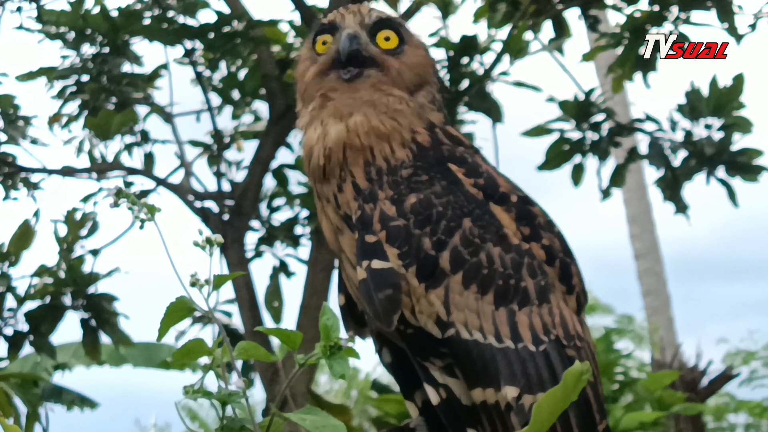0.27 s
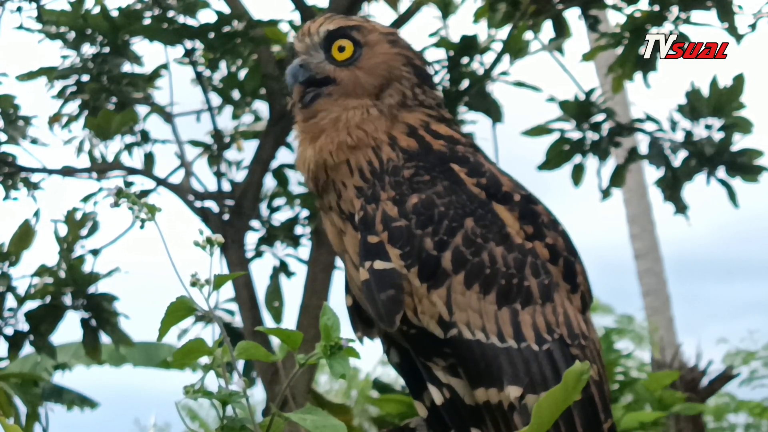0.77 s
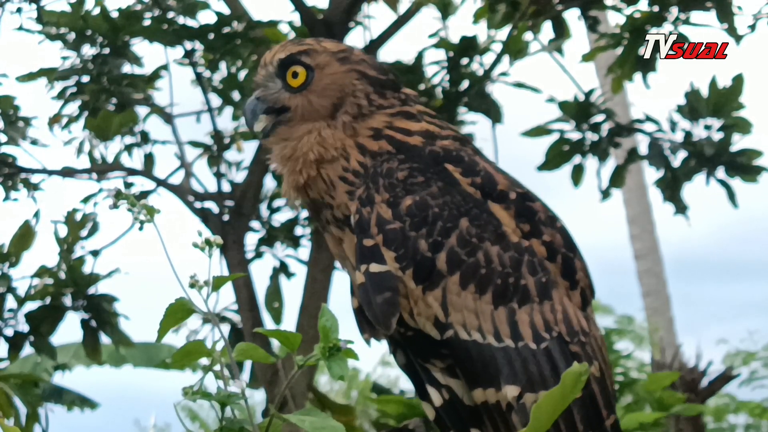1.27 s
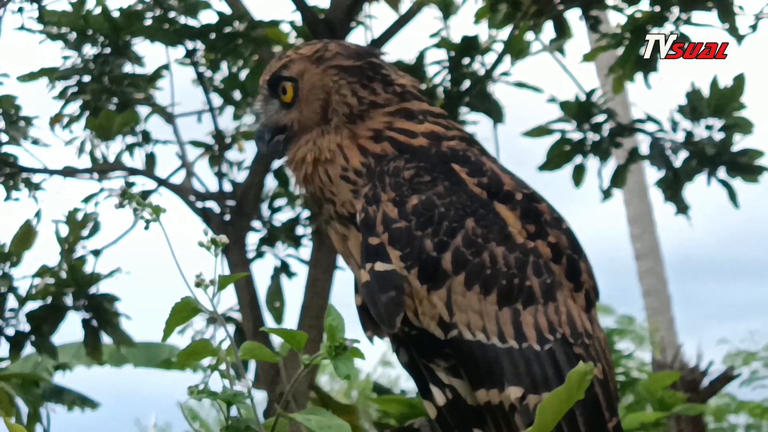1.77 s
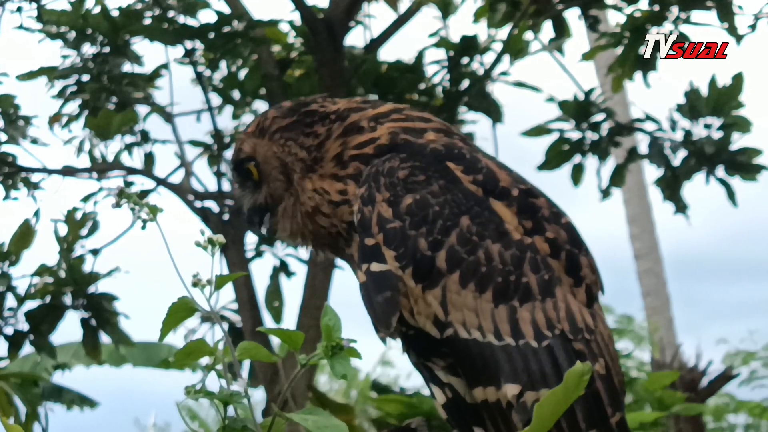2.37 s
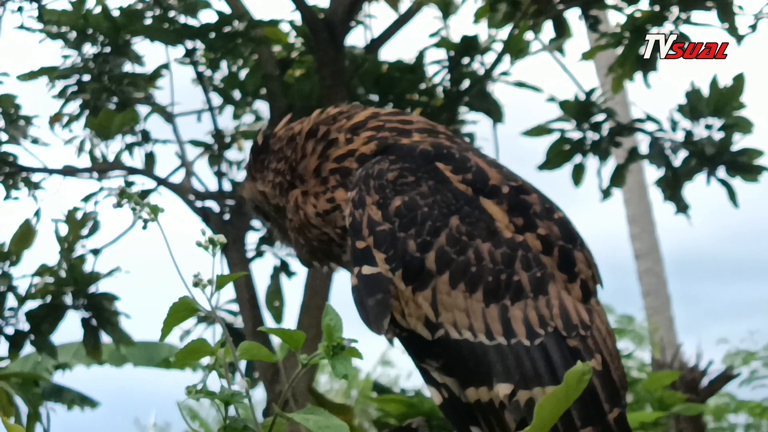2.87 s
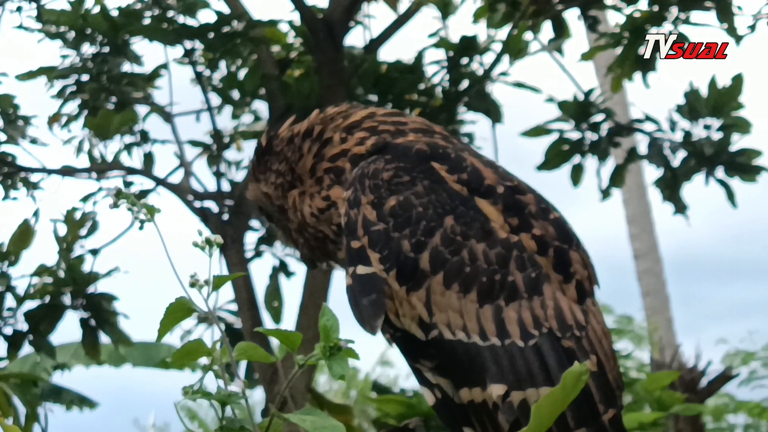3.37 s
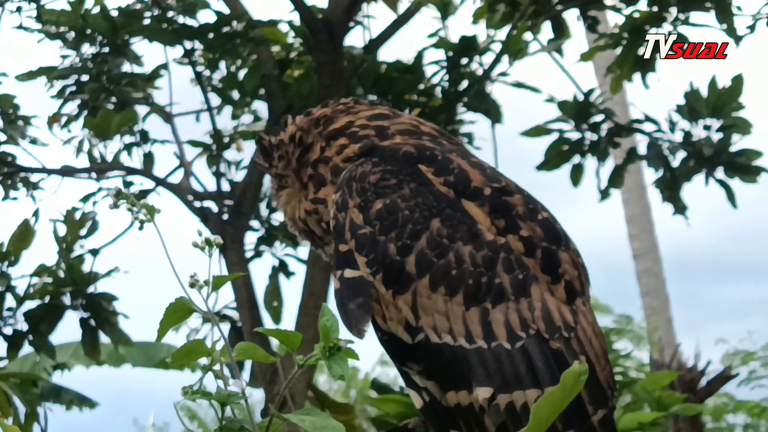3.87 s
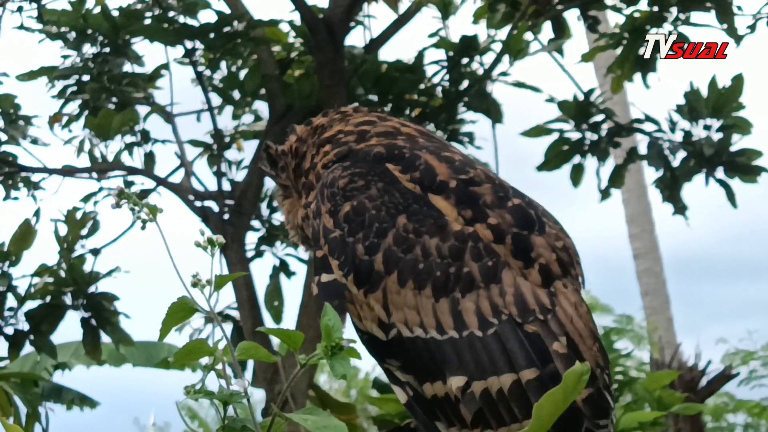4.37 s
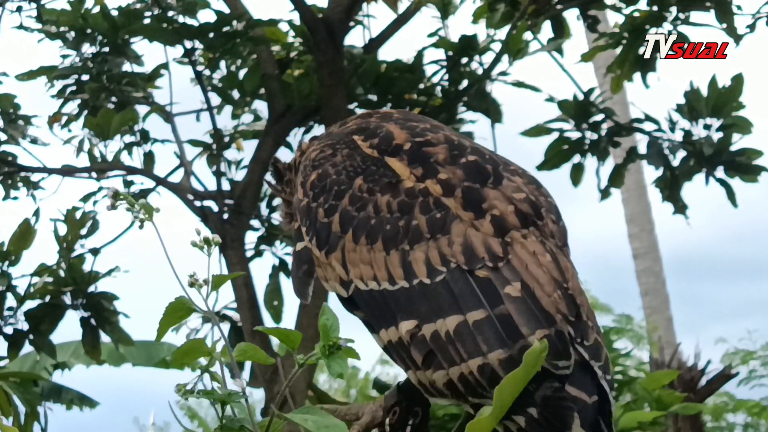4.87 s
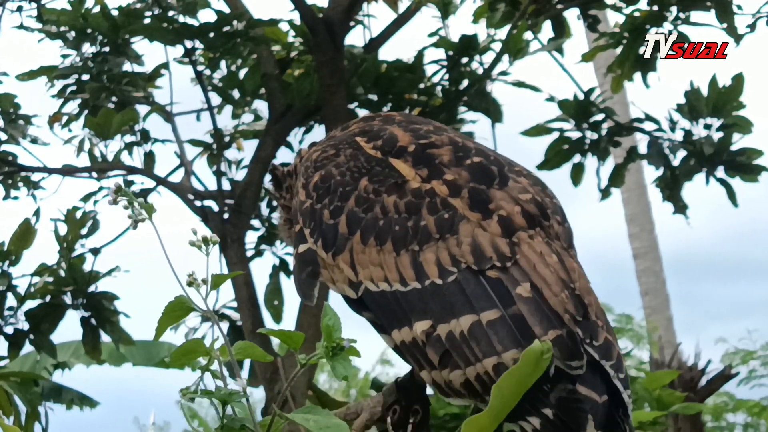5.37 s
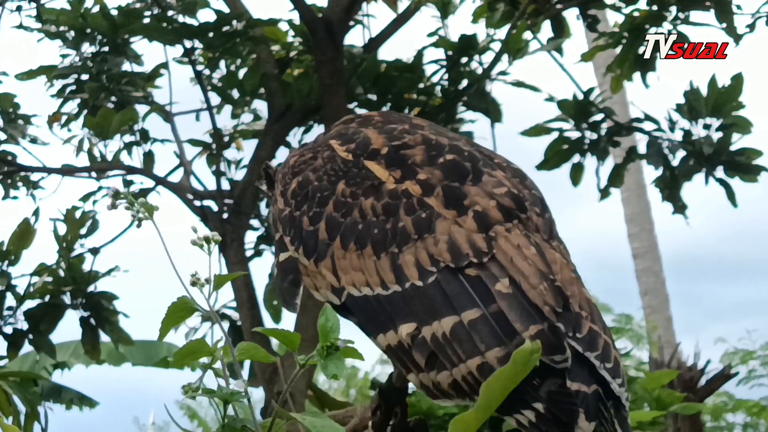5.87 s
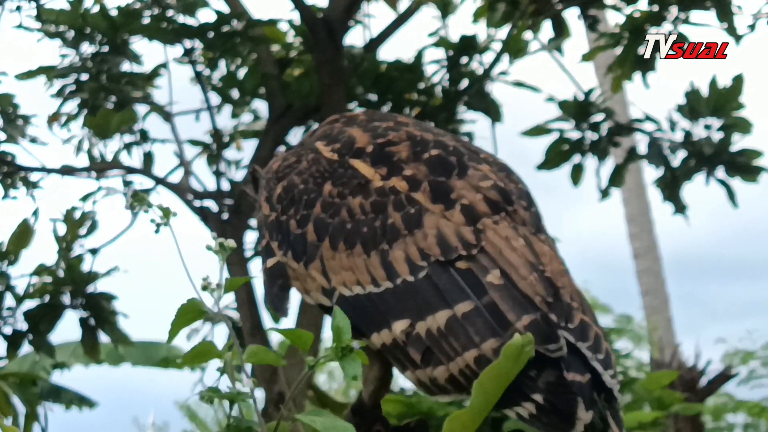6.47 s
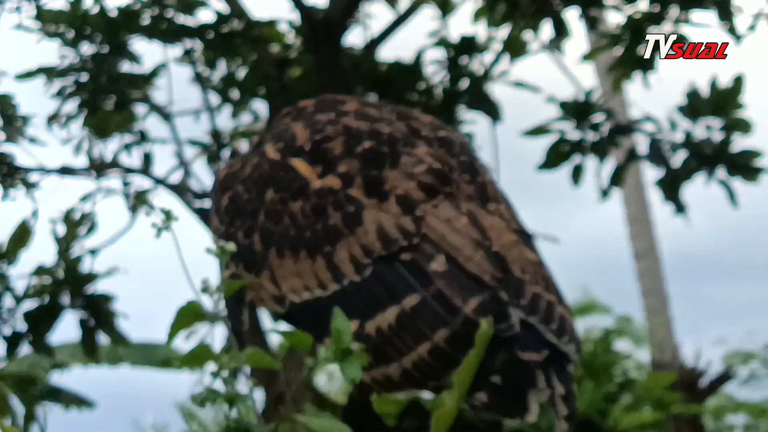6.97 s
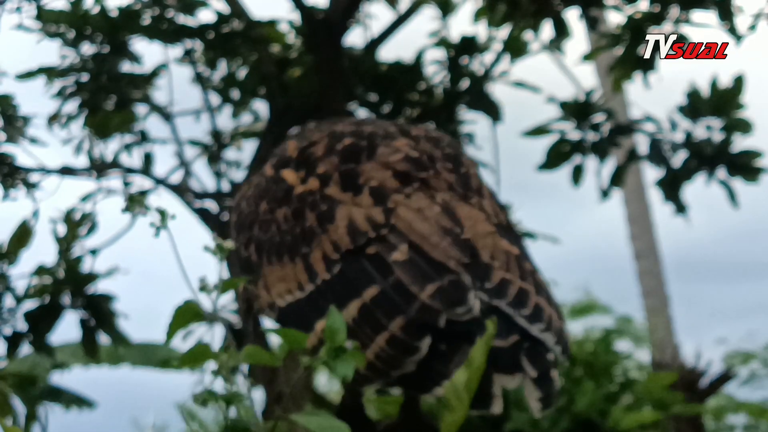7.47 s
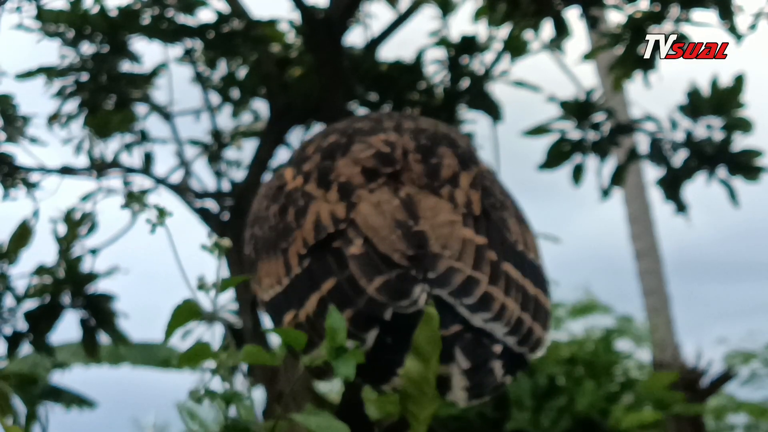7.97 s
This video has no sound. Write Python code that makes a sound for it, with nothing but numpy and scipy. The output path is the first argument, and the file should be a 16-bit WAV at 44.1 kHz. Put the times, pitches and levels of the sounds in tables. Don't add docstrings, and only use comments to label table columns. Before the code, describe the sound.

A small owl gives soft whistled hoots in short-long pairs over a constant buzzing of cicadas, with small birds chirping and light wind bumping the microphone.

```python
import sys
import numpy as np
from scipy import signal
from scipy.fft import rfft, irfft, next_fast_len
from scipy.io import wavfile

SR = 44100
rng = np.random.default_rng(int(sys.argv[2]) if len(sys.argv) > 2 else 0)


def magnitude_from_level(level_db):
    exponent = np.asarray(level_db, float) / 20
    return 10 ** exponent


def file_out(sig):
    cols = np.atleast_2d(sig).T
    lim = np.clip(cols, -1, 1)
    pcm = np.round(lim * 32767).astype(np.int16)
    wavfile.write(sys.argv[1], SR, pcm)


N = 362061


def rms_one(x):
    return x / np.sqrt(np.mean(x ** 2) + 1e-20)


def in_time(rows):
    s, *columns = np.transpose(rows)
    return [np.interp(np.arange(N) / SR, s, c) for c in columns]


def drift(rate_hz, size):
    r = np.exp(-80 * np.pi * rate_hz / SR)
    noise = rng.standard_normal(size // 40 + 1002)
    slow = signal.lfilter([1], [1, -2 * r, r * r], noise)[1000:]
    return np.interp(np.arange(size) / 40, np.arange(len(slow)), rms_one(slow))


def coloured(spectrum):
    size = next_fast_len(N)
    hz = np.fft.rfftfreq(size, 1 / SR) + 1e-3
    points_hz, points_db = np.transpose(spectrum)
    gain = magnitude_from_level(np.interp(np.log(hz), np.log(points_hz), points_db, left=-90, right=-90))
    return rms_one(irfft(rfft(rng.standard_normal(size)) * gain, size)[:N])


def add(out, s, sound):
    i = round(s * SR)
    out[i:i + len(sound)] += sound[:N - i]


def note(length_s, pitches_hz, sharp):
    u = np.arange(round(length_s * SR)) / (length_s * SR)
    hz = np.polyval(np.polyfit([0, .5, 1], pitches_hz, 2), u)
    swell = np.sin(np.pi * u) ** sharp
    return np.sqrt(2) * np.sin(2 * np.pi * np.cumsum(hz) / SR) * swell


def background():
    # start_s, level_db
    chorus_swells = [(0, -35), (1.3, -33), (1.8, -35), (2.77, -32.5), (2.86, -39.5), (4, -41), (5.5, -35.5),
                     (5.62, -41.5), (7.05, -38.5), (7.3, -42.5), (7.7, -47.5), (8.21, -45)]
    # pitch_hz, level_db (per Hz)
    chorus_colour = [(1500, -50), (2000, -4), (2400, 4), (3100, -4.5), (3500, 3), (3650, 8), (4250, -2),
                     (4700, 4.5), (5500, 1.5), (6500, 6), (7500, 3.5), (9000, 1.5), (11000, -11)]
    air_colour = [(22, -30), (60, -18), (170, -20.5), (257, -12), (313, -9), (743, -7), (2110, -7.5),
                  (3000, -10), (4100, -16), (5400, -9), (6100, 1), (7150, -12), (7820, -18), (11000, -15.5)]
    chorus_db, = in_time(chorus_swells)
    air = magnitude_from_level(-29.5 + 0.6 * drift(14, N)) * coloured(air_colour)
    chorus = magnitude_from_level(chorus_db + 6.5 + 0.75 * drift(33, N)) * coloured(chorus_colour)
    hiss_db = -60.5 + 0.87 * (chorus_db - chorus_db.mean())
    hiss = magnitude_from_level(hiss_db + 2.5 * drift(10, N)) * coloured([(11000, 5.5), (12000, 0), (13100, -6.0)])
    return air + chorus + hiss


def wind():
    # middle_s, length_s, level_db
    gusts = [(.05, 0.19, -41), (0.262, 0.2, -43), (0.426, 0.18, -47), (.65, 0.34, -49), (.97, 0.12, -46),
             (1.207, 0.2, -45.5), (1.37, 0.12, -49), (1.643, 0.07, -51), (1.95, 0.48, -54),
             (3.104, 0.071, -32), (3.2, 0.072, -48), (3.654, 0.077, -45), (3.75, 0.094, -37),
             (3.88, 0.35, -47), (4.18, 0.053, -45), (4.43, 0.28, -49), (5.05, 0.18, -51), (5.5, .15, -48),
             (5.74, 0.1, -41.5), (5.925, 0.12, -44), (6.22, 0.087, -35), (6.34, .1, -43),
             (6.622, 0.34, -41.5), (6.97, 0.094, -40), (7.088, 0.095, -39), (7.223, .14, -41.5),
             (7.385, 0.2, -37.5), (7.534, .08, -44), (8.13, 0.13, -53), (2.63, 0.059, -47)]
    # pitch_hz, level_db (per Hz)
    wind_colour = [(13, -51), (22, -24), (87, 0), (125, 1.5), (161, -3.5), (195, -1), (318, -6.5),
                   (400, -7), (520, -56), (880, -120)]
    t = np.arange(N) / SR
    force = magnitude_from_level(-58 + 2.3 * drift(2.5, N))
    for s, length_s, level_db in gusts:
        force = force + magnitude_from_level(level_db) * np.exp(-(2.54 * (t - s) / length_s) ** 2)
    return force * magnitude_from_level(2.0 * drift(27, N)) * coloured(wind_colour)


def snaps():
    # start_s, peak_db
    twig_snaps = [
        (3.1557, -18),
        (3.5818, -23),
        (4.359, -23),
        (4.5396, -19),
        (6.8464, -21),
    ]
    # start_s, peak_db, length_s
    knock_pushes = [
        (.343, -19, .00015),
        (3.382, -19, .0004),
        (7.085, -22, .0004),
    ]
    twigs, knocks, t = np.zeros(N), np.zeros(N), np.arange(400) / SR
    for s, peak_db in twig_snaps:
        add(twigs, s, magnitude_from_level(peak_db + 2.5) * rng.standard_normal(len(t)) * np.exp(-t / 0.0029))
    for s, peak_db, length_s in knock_pushes:
        add(knocks, s, magnitude_from_level(peak_db) * np.exp(-((t - .002) / length_s) ** 2))
    bright = signal.butter(6, [2000, 6000], "band", fs=SR, output="sos")
    return knocks + signal.sosfilt(bright, twigs + 1e-18)


def katydid():
    # start_s, length_s, level_db
    bursts = [
        (5.2, 0.43, -68),
        (5.8, 0.8, -57.5),
        (6.78, 0.78, -58),
        (7.78, .6, -56.5),
    ]
    # pitch_hz, width_hz, level_db
    resonances = [(12350, 450, 0), (13780, 330, -4)]
    glides_hz = [500, 0]
    gate, progress = np.zeros(N), np.zeros(N)
    for s, length_s, level_db in bursts:
        size = round(length_s * SR)
        add(gate, s, magnitude_from_level(level_db) * signal.windows.tukey(size, .2))
        add(progress, s, np.linspace(-.5, .5, size))
    wings = magnitude_from_level(-2) * coloured([(11000, 2), (13300, -5), (14300, -12)])
    for (hz, width_hz, level_db), glide_hz in zip(resonances, glides_hz):
        band = coloured([(hz - width_hz, -14), (hz, 0), (hz + width_hz, -14)])
        wing = signal.hilbert(band, next_fast_len(N))[:N]
        climb = np.exp(2j * np.pi * np.cumsum(glide_hz * progress) / SR)
        wings = wings + magnitude_from_level(level_db) * np.real(wing * climb)
    return gate * magnitude_from_level(2.5 * drift(60, N) + 2.5 * drift(12, N)) * wings


def cicada(rows, width_hz, rough, blur_hz, fade_db, cancel_hz=4000, even_db=0, low_db=-40):
    first, last = round(rows[0][0] * SR), min(round(rows[-1][0] * SR), N)
    rate_hz, body_hz, level_db = [c[first:last] for c in in_time(rows)]
    size, clean = last - first, 0
    turn = 2 * np.pi * np.cumsum(rate_hz) / SR
    for k in range(int(4600 / rate_hz[0]), int(7600 / rate_hz[0])):
        away = (k * rate_hz - body_hz) / width_hz
        lower = (k * rate_hz - .855 * body_hz) / (.7 * width_hz)
        gain = np.exp(-np.abs(away) ** 3) + magnitude_from_level(low_db) * np.exp(-lower ** 2)
        gain = gain * (1 - .92 * np.exp(-((k * rate_hz - cancel_hz) / 75) ** 2))
        gain = gain * magnitude_from_level(even_db * (k % 2 == 0) + fade_db * drift(2.2, size))
        clean = clean + gain * np.sin(k * turn + .5 * drift(7.9, size) + rng.uniform(0, 2 * np.pi))
    clean = signal.hilbert(rms_one(clean), next_fast_len(size))[:size]
    uneven = (drift(blur_hz, size) + 1j * drift(blur_hz, size)) / np.sqrt(2)
    share = np.clip(rough, 0, 1)
    out = np.zeros(N)
    out[first:last] = magnitude_from_level(level_db) * np.real(clean * (np.sqrt(1 - share) + np.sqrt(share) * uneven))
    return out


def cicadas():
    # start_s, click_rate_hz, body_resonance_hz, level_db
    song_a = [(3.7, 234.82, 5760, -38), (4.1, 236.29, 6330, -32.5), (4.5, 237.39, 6500, -29.5),
              (5.5, 242.5, 6600, -31.5), (6, 243.68, 6640, -29.5), (6.5, 244.79, 6450, -33),
              (7, 245.39, 6530, -31), (7.6, 246.0, 6680, -33.5), (8.2, 246.51, 6700, -30.5)]
    song_b = [(0, 132.84, 6500, -38), (.5, 132.95, 6500, -34), (1, 133.15, 6500, -31.5),
              (1.5, 133.27, 6500, -30.5), (2, 133.42, 6450, -30.5), (2.5, 133.6, 6450, -33),
              (2.85, 133.7, 6500, -42)]
    song_c = [(0, 247.3, 6300, -34), (.3, 247.6, 6260, -32), (.6, 249.4, 6300, -33),
              (1.0, 250.6, 6300, -35), (1.4, 251.2, 6300, -45)]
    song_d = [(1.9, 278, 6350, -45), (2.2, 273, 6100, -37), (2.5, 274, 6000, -31),
              (2.9, 270.3, 5960, -28.5), (3.6, 270, 6030, -30.5), (3.9, 250.7, 6250, -33),
              (4.2, 236.6, 6600, -31), (4.6, 238.5, 6900, -31), (5, 242, 6900, -34)]
    song_e = [(6.3, 261.7, 5900, -45), (6.5, 257, 6100, -30.5), (6.8, 259.74, 5950, -38),
              (7.05, 275.3, 5950, -32), (7.3, 282.3, 5970, -30), (7.7, 278.4, 5780, -30),
              (8.2, 280, 5640, -36.5)]
    insects = cicada(song_a, width_hz=560, rough=0.21, blur_hz=92, fade_db=1.0, cancel_hz=6655)
    insects += cicada(song_b, width_hz=450, rough=0.1, blur_hz=60, fade_db=0.5, cancel_hz=6400, even_db=4.0)
    insects += cicada(song_c, width_hz=280, rough=0.28, blur_hz=60, fade_db=0.0)
    insects += cicada(song_d, width_hz=260, rough=0.97, blur_hz=122, fade_db=0.5, low_db=-4.5)
    insects += cicada(song_e, width_hz=450, rough=0.89, blur_hz=113, fade_db=0.0, low_db=-5.0)
    return insects


def small_birds():
    # start_s, length_s, level_db
    whistles = [
        (5.601, 0.193, -39),
        (6.594, 0.163, -39),
        (7.569, .185, -39.5),
    ]
    # turn_between_s, arch_top_hz, arch_db, flick_db
    phrases = [(6.15, 2800, -44, -36.5), (6.316, 2950, -35, -33), (6.47, 2800, -35, -32.5),
               (6.632, 2820, -36, -37), (6.787, 2740, -36.5, -37), (6.948, 2780, -40, -34),
               (7.108, 2600, -44, -38), (7.283, 2600, -46, -39), (8.03, 2770, -39, -43)]
    # start_s, length_s, start_hz, end_hz, level_db
    loose_notes = [(0.687, 0.028, 2310, 2500, -34), (0.771, 0.038, 2670, 2450, -34),
                   (0.857, 0.027, 2170, 2350, -40), (0.986, 0.028, 2670, 2320, -31),
                   (1.088, 0.028, 2485, 2340, -33), (1.15, .04, 2650, 2300, -38),
                   (1.58, .045, 2400, 2500, -34), (1.65, .02, 2550, 2700, -39),
                   (6.83, .04, 2960, 2420, -39)]
    out = np.zeros(N)
    for s, length_s, level_db in whistles:
        add(out, s, magnitude_from_level(level_db) * note(length_s, [2975, 2945, 2925], sharp=.3))
    arch_s, flick_s, turn_hz, flick_top_hz = .062, .036, 2140, 2520
    flick = [turn_hz, (turn_hz + flick_top_hz) / 2, flick_top_hz]
    for s, top_hz, arch_db, flick_db in phrases:
        up = [turn_hz + 90, top_hz - 200, top_hz]
        add(out, s - arch_s, magnitude_from_level(arch_db - 1.5) * note(arch_s / 2, up, sharp=.3))
        add(out, s - arch_s / 2, magnitude_from_level(arch_db) * note(arch_s / 2, up[::-1], sharp=0.25))
        add(out, s, magnitude_from_level(flick_db) * note(flick_s, flick, sharp=0.29))
    for s, length_s, start_hz, end_hz, level_db in loose_notes:
        glide = [start_hz, (start_hz + end_hz) / 2, end_hz]
        add(out, s, magnitude_from_level(level_db) * note(length_s, glide, sharp=0.3))
    return out


def chirps():
    # start_s, peak_db, pitch_hz
    calls = [
        (1.379, -13, 7670),
        (1.5244, -14, 7700),
        (4.0223, -19, 7700),
        (4.165, -19, 7660),
        (7.0953, -18, 7700),
        (7.2509, -25, 7700),
    ]
    out = np.zeros(N)
    for s, peak_db, hz in calls:
        sound = magnitude_from_level(peak_db - 4.5) * note(0.014, [hz - 550, hz + 70, hz - 300], sharp=0.91)
        add(out, s - .003, sound)
        add(out, s + 0.014, magnitude_from_level(-7.0) * sound)
    return out


def owl():
    # start_s, length_s, top_pitch_hz, level_db
    hoots = [
        (2.8, .1805, 1493, -12.6),
        (3.4875, .236, 1513, -13),
        (5.5548, .1794, 1492, -12.6),
        (6.2404, .236, 1513, -12.4),
    ]
    start_hz, end_hz = 1354, 1416
    top_share, rise_bend, fall_bend = .4955, 1.91, 1.01
    attack_s, release_s, tail_s, sag_db_per_s = .01925, .0028, .0514, 40
    strain_hz, strain_db_per_hz, strain_lag_s = 1481, .27, .011
    out = np.zeros(N)
    for s, length_s, top_hz, level_db in hoots:
        t = np.arange(round(length_s * SR)) / SR
        top_s = top_share * length_s
        rise = (top_hz - start_hz) * np.maximum(1 - t / top_s, 0) ** rise_bend
        fall = (top_hz - end_hz) * np.maximum((t - top_s) / (length_s - top_s), 0) ** fall_bend
        pitch = top_hz - rise - fall
        turn = 2 * np.pi * np.cumsum(pitch) / SR
        strain_db = strain_db_per_hz * np.maximum(np.interp(t - strain_lag_s, t, pitch) - strain_hz, 0)
        opening = np.tanh((t / attack_s) ** 2 / 4)
        closing = .5 - .5 * np.tanh((t - length_s + tail_s) / release_s)
        tail = magnitude_from_level(-14) * (1 - t / length_s) ** .5
        swell = opening * (closing + tail) * magnitude_from_level(level_db - sag_db_per_s * t - strain_db)
        add(out, s, np.sqrt(2) * swell * (np.cos(turn) + magnitude_from_level(-42) * np.sin(2 * turn)))
    return out


def hollow(x):
    # width_hz, gain (its sign tells whether it opposes or adds)
    resonances = [
        (11.3, -1.96),
        (5.4, 1.5),
    ]
    pitch_hz = 1491
    out = x
    for width_hz, gain in resonances:
        r = np.exp(-np.pi * width_hz / SR)
        poles = [1, -2 * r * np.cos(2 * np.pi * pitch_hz / SR), r * r]
        out = out + gain * signal.lfilter(np.array([1, 0, -1]) * (1 - r * r) / 2, poles, x + 1e-18)
    return out


def trees(x):
    t60_s = .62
    t = np.arange(round(t60_s * SR)) / SR
    echoes = rng.standard_normal(len(t)) * magnitude_from_level(-60 * t / t60_s) * np.minimum(t / .05, 1)
    return signal.fftconvolve(x, echoes / np.sqrt(np.sum(echoes ** 2)))[:N]


def scene():
    hoots, near, far = owl(), chirps(), small_birds()
    echoes = magnitude_from_level(-16.5) * trees(magnitude_from_level(-7) * hoots + near + magnitude_from_level(12) * far)
    birds = hollow(hoots) + near + far + echoes
    mono = birds + cicadas() + katydid() + snaps() + background() + wind()
    return np.array([mono, mono])


def band_limit(x):
    return signal.sosfilt(signal.butter(12, 14350, fs=SR, output="sos"), x)


def record(dry):
    return band_limit(dry)


dry = scene()
out = record(dry)
file_out(out)
```